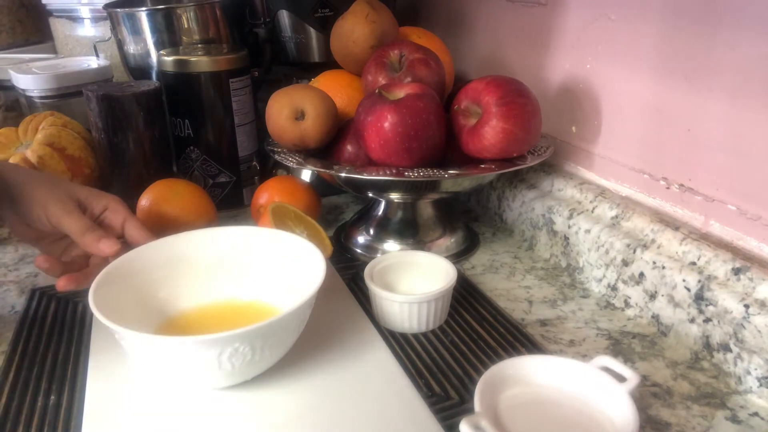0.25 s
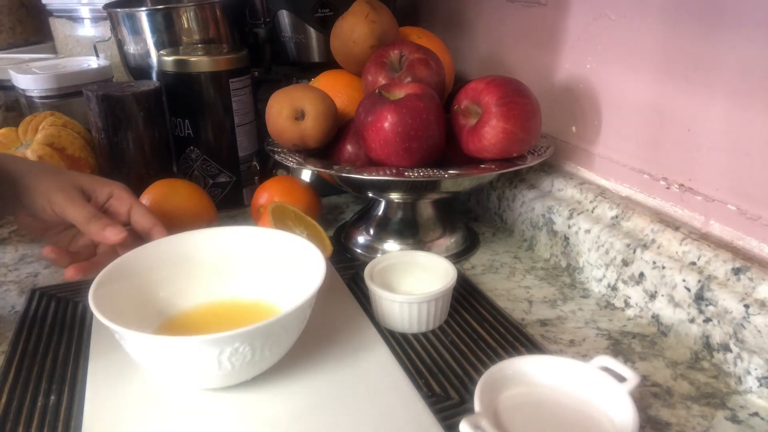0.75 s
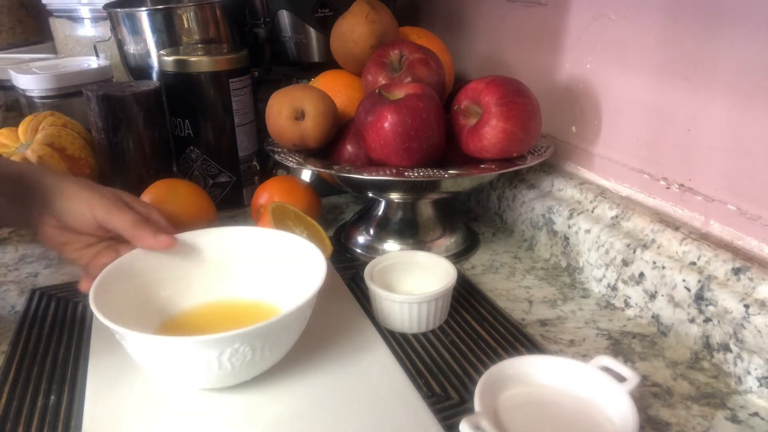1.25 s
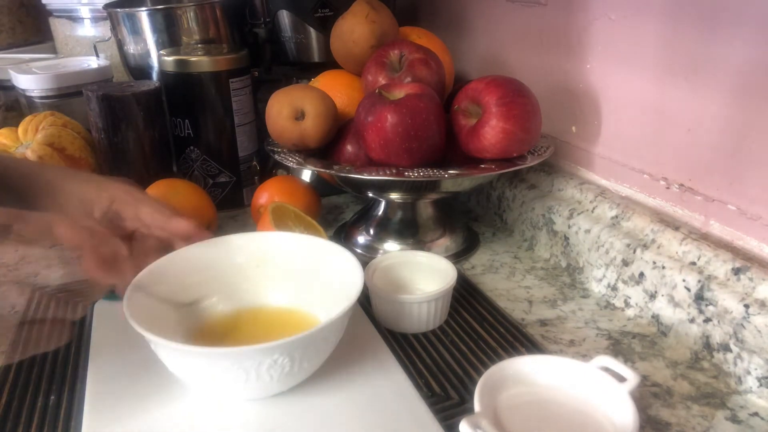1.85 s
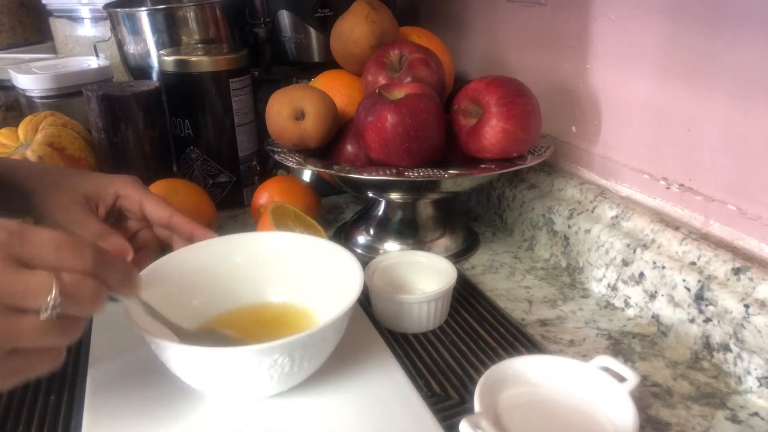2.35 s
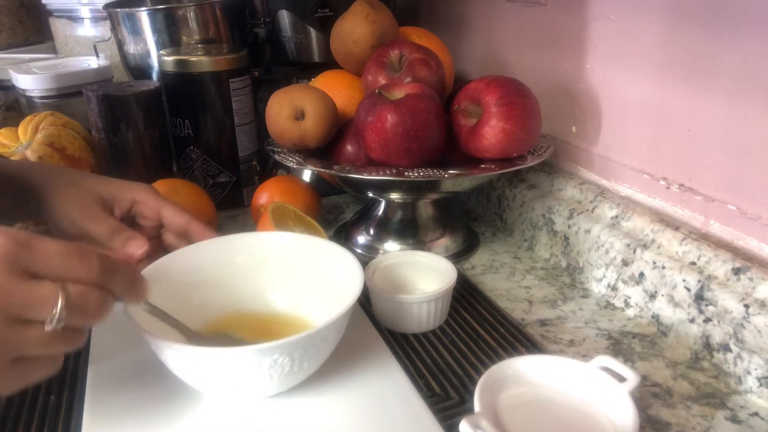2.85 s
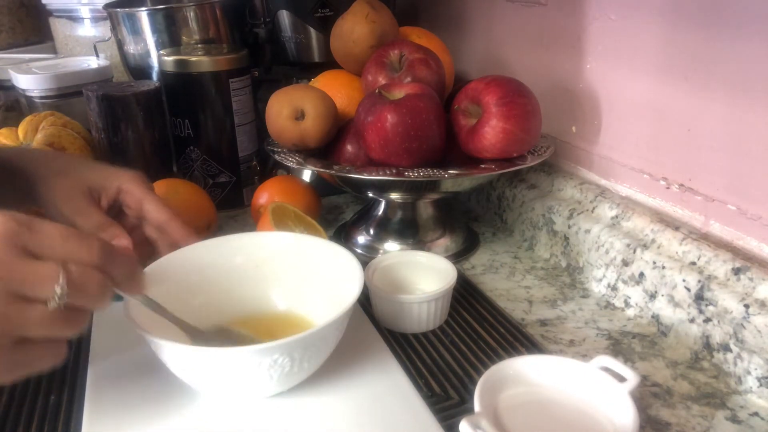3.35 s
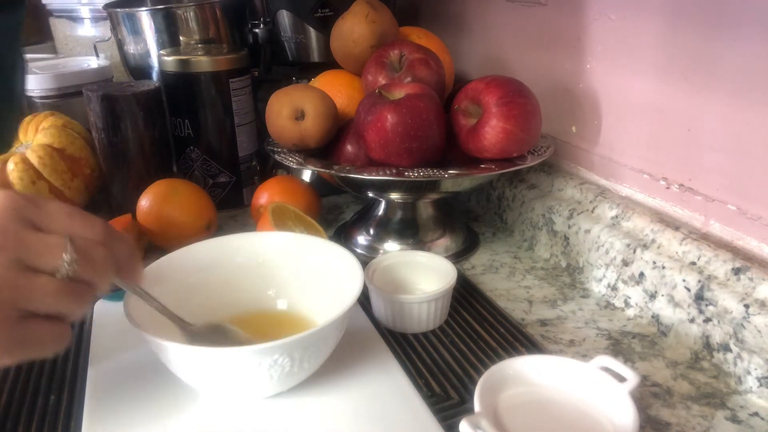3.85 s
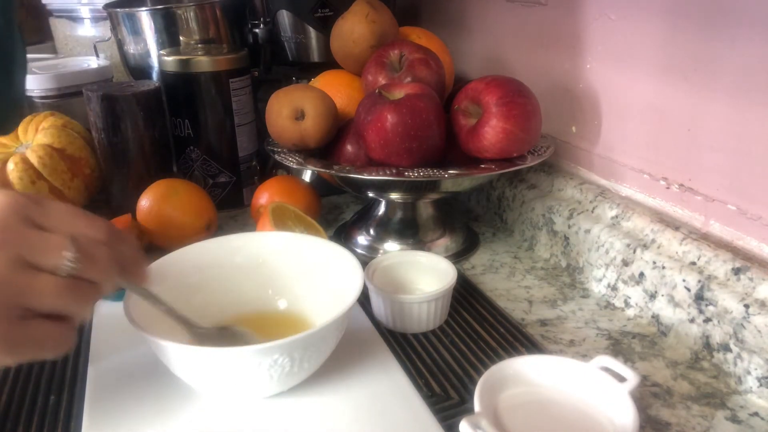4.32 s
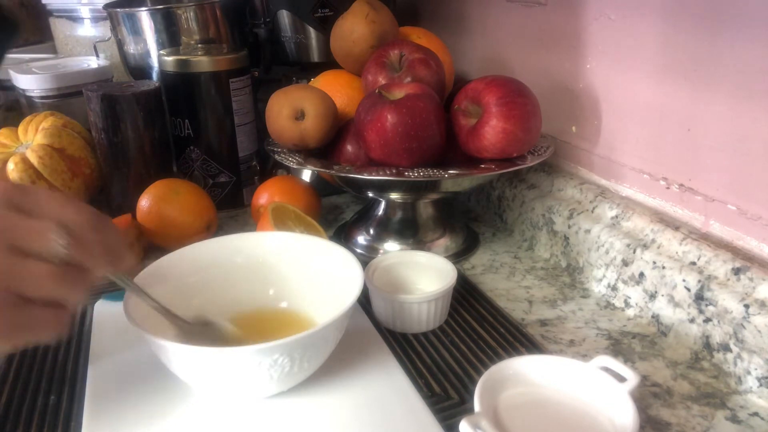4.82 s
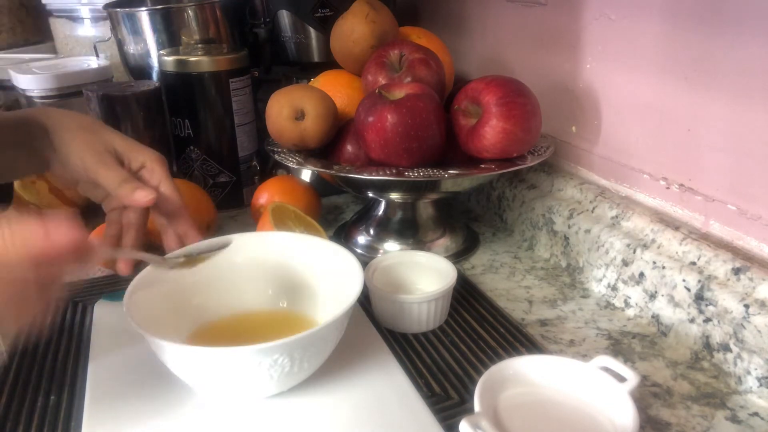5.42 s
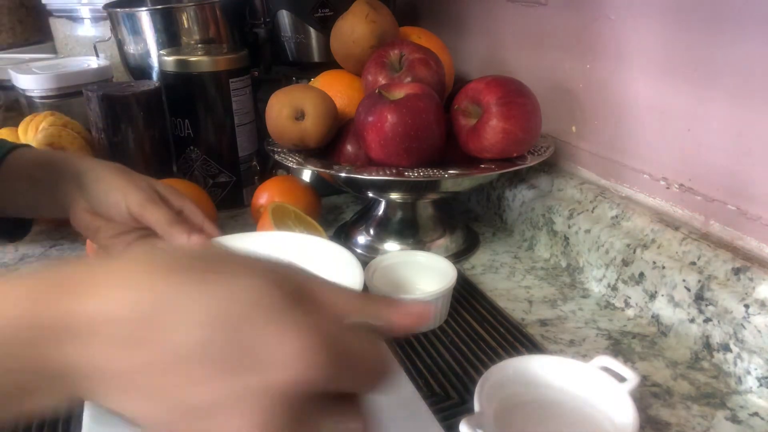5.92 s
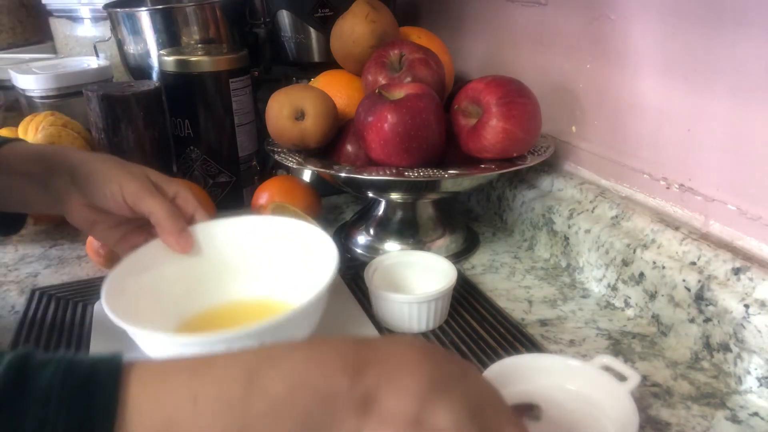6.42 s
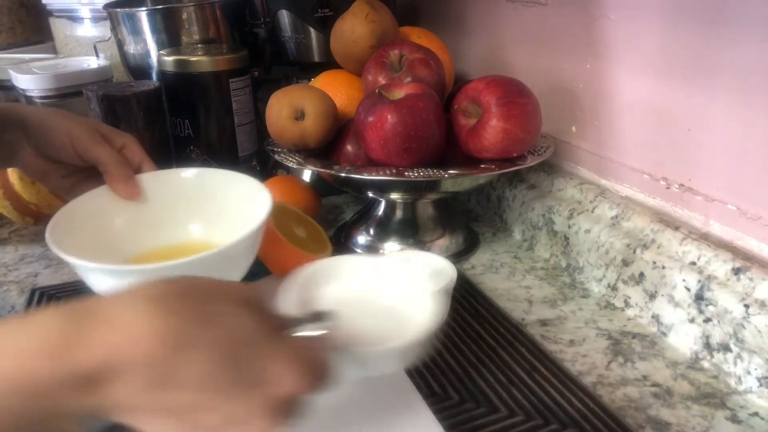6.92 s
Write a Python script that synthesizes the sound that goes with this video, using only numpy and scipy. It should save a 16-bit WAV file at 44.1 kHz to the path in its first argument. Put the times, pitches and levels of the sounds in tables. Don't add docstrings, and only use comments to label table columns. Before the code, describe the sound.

Booming bowl knocks and a rasping slide on a counter, a spoon clink, squeaky singing stirring scrapes, then faint hand rustles over a fridge hum.

```python
import sys
import numpy as np
from scipy import signal
from scipy.fft import rfft, irfft, next_fast_len
from scipy.io import wavfile
from scipy.ndimage import uniform_filter1d

SR = 44100
rng = np.random.default_rng(int(sys.argv[2]) if len(sys.argv) > 2 else 0)


def wav_out(sig):
    wavfile.write(sys.argv[1], SR, np.round(np.clip(np.atleast_2d(sig).T, -1, 1) * 32767).astype(np.int16))


def how_loud(loudness_db):
    steps = np.asarray(loudness_db, float) / 20
    return 10 ** steps


N = 316197

BOOM_HZ, BOOM_UP_HZ = 127, 153.5
LET_GO_S = 3.48
SWELL_DB = 12
# frequency in Hz, level in dB per Hz.
DULL = [(250, -14.5), (450, -1.5), (800, 6), (1200, 1), (2200, -10), (3500, -25.5)]
# frequency in Hz, level in dB per Hz.
BRIGHT = [(1500, -2), (2500, -7.5), (4500, -3), (6000, -6), (7500, -9), (11000, -29), (15000, -49.5)]


def unit(x):
    return x / np.sqrt(np.mean(x ** 2) + 1e-20)


def add(track, s, sound):
    track[round(s * SR):][:len(sound)] += sound


def along(points, hz):
    f, v = np.transpose(points)
    return np.interp(np.log(hz + 1), np.log(f + 1), v)


def curves(rows, outside=None):
    s, *cols = np.transpose(rows)
    return [np.interp(np.arange(N) / SR, s, c, outside, outside) for c in cols]


def swells(rows, order=1):
    power, t = np.full(N, 1e-15), np.arange(N) / SR
    for s, rise, fall, db in rows:
        near = slice(max(int((s - 5 * rise) * SR), 0), int((s + 5 * fall) * SR))
        away = np.maximum((s - t[near]) / rise, (t[near] - s) / fall)
        power[near] += how_loud(2 * (db - SWELL_DB * away ** order))
    return 10 * np.log10(power)


def noise(spectrum):
    size = next_fast_len(N)
    hz = np.fft.rfftfreq(size, 1 / SR)
    inside = (hz > spectrum[0][0]) & (hz < spectrum[-1][0])
    coloured = rfft(rng.standard_normal(size)) * how_loud(along(spectrum, hz)) * inside
    return unit(irfft(coloured, size)[:N])


def grit(rate, spread_db):
    bumps = rng.standard_normal(N // 20)
    return unit(how_loud(spread_db * np.interp(np.arange(N) * rate / SR, np.arange(len(bumps)), bumps)))


def resonate(x, hz, width_hz, onset=5):
    turn = np.exp(2j * np.pi * np.cumsum(np.broadcast_to(hz, N)) / SR)
    keep = np.exp(-np.pi * abs(width_hz) / SR)
    slow = signal.lfilter([1 - keep ** onset], np.poly([keep, keep ** onset]), x / turn)
    return np.real(slow * turn)


def ring(modes, cycles):
    out = np.zeros(SR)
    for hz, db, t60 in modes:
        t = np.arange(min(SR, int(1.5 * t60 * SR))) / SR
        build = 1 - np.exp(-t * hz / cycles)
        add(out, 0, how_loud(db - 60 * t / t60) * np.sin(2 * np.pi * hz * t) * build)
    return out


def crack(t60, low_hz, high_hz, hold=0):
    burst = rng.standard_normal(SR) * how_loud(-60 * np.maximum(np.arange(SR) / SR - hold, 0) / t60)
    band = signal.butter(3, [low_hz, min(high_hz, .45 * SR)], "band", fs=SR, output="sos")
    return signal.sosfilt(band, burst) * np.sqrt(SR / 2 / (high_hz - low_hz))


def catch(hz, half_s):
    t = np.arange(SR // 10) / SR
    return (t / half_s) ** 2 * np.exp(1 - (t / half_s) ** 2) * np.sin(2 * np.pi * hz * t)


def knocks():
    # start in seconds, peak in dB, crack in dB over it.
    hits = [
        (0.4031, -24.5, -8.5),
        (0.9381, -16, -11),
        (1.0204, -15, -13.5),
        (3.4453, -32, -36),
    ]
    # top frequency in Hz, level in dB, t60 in seconds.
    clatter = [(2630, -16, 0.32), (4700, 7.5, 0.023), (1700, -6.5, 0.261), (2500, -4.5, 0.041)]
    # frequency in Hz, level in dB, t60 in seconds.
    board = [
        [(BOOM_HZ, -2, 0.49), (BOOM_UP_HZ, 0, 0.23), (220.5, -2.8, 0.14), (314, 0.9, 0.049), (580, 11.8, 0.032),
         (833, 3.77, 0.063), (1717, 2.5, 0.039), (2390, -2, 0.031), (2700, -6.5, 0.039), (4050, -11.5, 0.052),
         (4730, -8.5, 0.0305), (7260, 2.3, 0.011), (7770, -1, 0.0196)],
        [(BOOM_HZ, -10.5, 0.33), (BOOM_UP_HZ, -7.5, 0.18), (231, -2.5, 0.08), (650, -8, 0.07), (875, -5, 0.055),
         (1110, -6, 0.025), (1310, 0.5, 0.03), (1650, -1.5, 0.049), (2345, 2.5, 0.029), (1900, -4, .03),
         (2880, -6, 0.053), (4020, -6, 0.021), (6040, -6.5, 0.048), (7750, -4.5, 0.03)],
        [(BOOM_HZ, -6.5, 0.33), (BOOM_UP_HZ, 0, 0.24), (241, 10, 0.056), (290, -6.5, 0.1), (455, 3, 0.0467),
         (530, 8.5, 0.034), (570, 7.1, 0.048), (742, 2.1, 0.044), (840, -0.5, 0.08), (972, 14.8, 0.017),
         (1093, 9, 0.012), (1800, -1.3, 0.043), (2380, -11, 0.042)],
        [(416, 0, 0.014), (700, 23.5, 0.0064), (2300, 6.5, 0.00594)],
    ]
    # start in seconds, level in dB.
    rebounds = [
        (0.429, -44),
        (0.441, -40),
    ]
    # start in seconds, peak in dB.
    chatter = [(0.4268, -31.5), (0.4405, -31), (0.4483, -36), (0.4555, -37), (0.488, -55), (0.507, -50),
               (0.52, -47), (0.533, -49), (0.549, -49), (0.559, -51), (0.585, -56), (0.9524, -38.5),
               (1.0208, -23), (1.0317, -27), (1.043, -37), (1.05, -33), (1.064, -42), (1.0694, -43),
               (1.0968, -42)]
    # frequency in Hz, level in dB, t60 in seconds.
    cutlery = [(2530, 2, 0.023), (4220, -3.5, .03), (4780, 4, 0.015), (5900, 5.5, 0.01), (6800, 8.5, 0.015),
               (7810, 10.5, 0.016), (8700, 8.5, .012), (9470, 8, .012)]
    boom_lag_s = .004
    out = np.zeros(N + SR)
    for (s, db, crack_db), (top_hz, clatter_db, clatter_t60), modes in zip(hits, clatter, board):
        wood = [m for m in modes if m[0] > BOOM_UP_HZ]
        boom = [m for m in modes if m[0] <= BOOM_UP_HZ]
        add(out, s, how_loud(db - 8.5) * ring(wood, cycles=0.91))
        add(out, s + boom_lag_s, how_loud(db - 7.5) * ring(boom, cycles=0.91))
        add(out, s, how_loud(db + crack_db - 5.0) * crack(0.014, low_hz=3795, high_hz=11600, hold=0.0011))
        rattle = crack(clatter_t60, low_hz=300, high_hz=top_hz, hold=0.0026)
        add(out, s, how_loud(db + clatter_db - 12.5) * rattle)
    add(out, hits[1][0], how_loud(-37.5) * crack(.17, low_hz=450, high_hz=2500, hold=.008))
    for s, db in rebounds:
        add(out, s, how_loud(db) * (ring(board[0][2:], cycles=1.0) + how_loud(5) * ring(board[0][1:3], cycles=.9)))
    for s, db in chatter:
        steel = [(hz, level + rng.normal(0, 0.67), t60) for hz, level, t60 in cutlery]
        tick = how_loud(db - 5.0) * crack(0.0035, low_hz=5500, high_hz=14700)
        add(out, s + 0.00097, how_loud(db - 17.5) * ring(steel, cycles=1.8) + tick)
    return out[:N]


def slides():
    # time in seconds, body in dB, grit in dB over the body.
    nudge_levels = [(0.465, -50.5, -17), (0.493, -63, -7), (0.537, -53.5, -13.5), (0.547, -64.5, -2),
                    (0.569, -58, -13), (0.63, -62.5, 0), (0.642, -65, 4.5), (0.685, -61, 0),
                    (0.695, -62.5, -4.5), (0.73, -65, -4), (0.75, -72.5, 1), (0.8, -76, -5.5),
                    (0.82, -68, -6.5), (0.88, -72, -5.5), (0.925, -66.5, -1.5)]
    # frequency in Hz, width in Hz, level in dB.
    foot = [(719, 22, 4.5), (1704, 42, 3.5), (2710, 130, -2), (4096, 200, -8.5), (5850, 200, -7.5),
            (7480, 400, -10), (12400, 500, -17.5)]
    # frequency in Hz, level in dB per Hz.
    fizz = [(6500, -2), (15500, -11.5)]
    # time in seconds, body in dB, grit in dB over the body.
    slide_levels = [
        (1.29, -100, 6),
        (1.316, -56.5, -9),
        (1.372, -49.5, -11),
        (1.604, -54, -17),
        (1.82, -78, -12),
    ]
    # frequency in Hz, level in dB per Hz.
    rasp = [(71, -43), (120, 0), (210, -1.5), (355, -7), (457, 0.5), (632, -15), (692, -9), (993, -2.5),
            (1800, -9), (2940, -23.5), (4870, -26.5), (7650, -46), (9000, -56), (11700, -62), (19800, -120)]
    # time in seconds, peak in dB, pitch in Hz.
    snag_rows = [(1.319, -51, 1880), (1.32, -38.5, 1318), (1.329, -39, 1185), (1.348, -42, 980),
                 (1.357, -38, 1040), (1.378, -45, 824), (1.378, -32, 1020), (1.419, -34, 1280),
                 (1.433, -32, 1160), (1.476, -33, 1065), (1.495, -33.5, 1237), (1.524, -37.5, 1010),
                 (1.632, -44, 1118), (1.647, -38, 1160), (1.688, -48, 1170)]
    rub = grit(rate=170, spread_db=5.0) * rng.standard_normal(N)
    body_db, grit_db = curves(nudge_levels, -150)
    sung = np.zeros(N)
    for hz, width, db in foot:
        follow_db = grit_db + 9.5 if hz > 3500 else 0
        sung += how_loud(db + follow_db) * unit(resonate(rub, hz, width))
    nudge = how_loud(body_db - 4.5) * (sung + how_loud(-2.5) * noise(DULL))
    nudge += how_loud(body_db + grit_db - 2.0) * (noise(BRIGHT) + how_loud(-3.5) * noise(fizz))

    body_db, grit_db = curves(slide_levels, -150)
    slide = how_loud(body_db + 3.5) * noise(rasp) + how_loud(body_db + grit_db - 7.5) * noise(BRIGHT)
    snags = np.zeros(N)
    for s, db, hz in snag_rows:
        snag = catch(hz, half_s=0.0034) + how_loud(-8.5) * catch(0.93 * hz, half_s=0.00246)
        add(snags, s - .002, how_loud(db - 6.5) * snag)
    return snags + nudge + grit(rate=160, spread_db=1.5) * slide


def spoon_controls():
    # peak in seconds, rise in seconds, fall in seconds,
    # pressure in dB, steepness in dB (upper resonance over the lower).
    strokes = [(2.13, 0.089, 0.108, -63.5, -5), (2.38, 0.074, 0.11, -58.5, -12),
               (2.55, 0.1, 0.089, -53, -17), (2.71, 0.109, 0.046, -60, -5.5), (2.9, 0.063, 0.13, -55, -15),
               (3.01, 0.177, 0.066, -63, -32), (3.109, 0.072, 0.084, -50.5, -11.5),
               (3.25, 0.15, 0.065, -57, -8), (3.44, 0.14, 0.051, -52, -8), (3.569, 0.07, 0.064, -45.5, -11),
               (3.72, 0.068, 0.097, -53, -3), (3.86, 0.033, 0.13, -54.5, -2.5),
               (3.95, 0.11, 0.063, -50, -8.5), (4.07, 0.15, 0.079, -54, -17.5),
               (4.24, 0.1, 0.11, -54, -5.5), (4.371, 0.0273, 0.13, -56.5, 1), (4.47, .12, 0.112, -49, -17),
               (4.62, 0.044, 0.091, -48.5, -12), (4.73, 0.0534, 0.14, -47.5, -9.5),
               (4.815, 0.016, 0.016, -45, -5.5)]
    # middle in seconds, length in seconds,
    # level in dB, first pitch in Hz, last pitch in Hz.
    squeaks = [(2.136, 0.077, -76, 5970, 5950), (2.449, 0.089, -67.5, 5780, 6400),
               (2.564, 0.027, -68, 5250, 5250), (2.93, 0.085, -68, 5250, 5230),
               (3.11, 0.019, -58, 5200, 5260), (3.253, 0.044, -65.5, 5180, 5100),
               (3.446, 0.058, -57.5, 5570, 5670), (3.543, 0.0225, -63, 6090, 6120),
               (3.586, 0.022, -76, 6000, 5900), (3.716, 0.07, -62.5, 5650, 5830),
               (3.789, 0.176, -71, 6160, 6100), (3.906, 0.067, -65, 5550, 5500),
               (3.944, 0.093, -61.5, 5330, 5120), (4.24, 0.085, -62, 5580, 6040),
               (4.394, 0.082, -66.5, 5200, 5250), (4.45, .05, -67, 5500, 5650),
               (4.49, 0.049, -67, 5250, 5200), (4.622, 0.16, -75, 6060, 5850),
               (4.705, 0.12, -60.5, 5680, 5900), (4.831, 0.03, -61.5, 6158, 6060)]
    lift_s, lift_db_per_s = 4.83, 504
    edge_held_db, edge_free_db = -13.5, -10.5
    handle_held_db, handle_free_db = -68, -62.5
    handle_swing = 0.98
    t = np.arange(N) / SR
    lift_db = lift_db_per_s * np.maximum(t - lift_s, 0)
    press_db = swells([row[:4] for row in strokes], order=1.5) - lift_db
    steep = [(s, rise, fall, db + steep_db) for s, rise, fall, db, steep_db in strokes]
    second_db = swells(steep, order=2) - lift_db
    tip_db = swells([(s, 0.7 * length, 0.55 * length, db - 2.0) for s, length, db, _, _ in squeaks], order=2)
    glides = []
    for s, length, _, first_hz, last_hz in squeaks:
        glides += [(s - length / 2, first_hz), (s + length / 2, last_hz)]
    tip_hz, = curves(glides)
    free = t > LET_GO_S
    edge_db = second_db + np.where(free, edge_free_db, edge_held_db)
    handle_db = np.where(free, handle_free_db, handle_held_db) + handle_swing * (press_db + 52.5)
    return press_db, second_db, tip_db, tip_hz, edge_db, np.minimum(handle_db, press_db)


def stirring():
    # time in seconds, spoon resonance in Hz,
    # second resonance in Hz.
    path = [(2.1, 1272, 1620), (2.28, 1210, 1855), (2.45, 1120, 1814), (2.53, 1142, 1690),
            (2.75, 1274, 1760), (2.92, 1110, 1770), (3.06, 1234, 1874), (3.14, 1050, 2000),
            (3.38, 1233, 1810), (3.47, 1233, 1922), (3.58, 1280, 1670), (3.72, 1340, 1730),
            (3.87, 1170, 1724), (3.97, 1114, 1820), (4.04, 1174, 1810), (4.15, 1236, 1730),
            (4.3, 1196, 1770), (4.46, 1098, 1687), (4.63, 1225, 1660), (4.82, 1110, 1660)]
    # time in seconds, peak in dB, pitch in Hz, half length in seconds.
    skips = [(2.362, -47, 1174, 0.0074), (2.418, -49, 1070, 0.0073), (2.499, -45.5, 1190, 0.006),
             (2.889, -52, 1170, 0.012), (2.9728, -44, 1145, 0.0057), (3.002, -40, 1178, 0.0079),
             (3.029, -40.5, 1154, 0.0077), (3.059, -43.5, 1200, 0.0056), (3.095, -43.5, 1194, 0.0049),
             (3.112, -47, 1075, 0.0059), (3.395, -49, 1270, 0.0074), (3.421, -44, 1197, 0.0067),
             (3.442, -36, 1183, 0.0082), (3.4735, -36, 1200, 0.0112), (3.502, -44, 1270, 0.0066),
             (3.528, -35.5, 1242, 0.0073), (3.541, -39, 1320, 0.0053), (3.56, -37, 1310, 0.0064),
             (3.57, -44, 1330, 0.0052), (3.706, -36, 1220, 0.0026), (3.8155, -45, 1168, 0.0082),
             (3.84, -46, 1157, 0.0083), (3.866, -44, 1226, 0.007), (3.9052, -48, 1152, 0.0065),
             (3.906, -43, 1152, 0.0106), (3.9341, -37, 1157, 0.0071), (3.9475, -35, 1102, 0.011),
             (3.9856, -36, 1115, 0.0059), (4.0208, -41.5, 1206, 0.0085), (4.0568, -40.5, 1247, 0.0083),
             (4.226, -45, 1275, 0.0058), (4.245, -37.5, 1214, 0.0067), (4.337, -44, 1105, 0.0079),
             (4.355, -43, 1209, 0.0057), (4.365, -40.5, 1250, 0.0053), (4.386, -45, 1080, 0.0079),
             (4.412, -42.5, 1170, 0.011), (4.425, -34.5, 1143, 0.011), (4.451, -36, 1138, 0.0074),
             (4.479, -36, 1108, 0.0137), (4.509, -37.5, 1150, 0.0065), (4.53, -38, 1100, 0.0053),
             (4.578, -38.5, 1083, 0.0068), (4.6094, -32.5, 1227, 0.011), (4.634, -37.5, 1207, 0.0098),
             (4.6727, -45, 1301, 0.0094), (4.688, -44, 1256, 0.016), (4.7188, -37, 1137, 0.0067),
             (4.793, -46, 1750, 0.0034), (4.805, -32, 1200, 0.0013)]
    # frequency in Hz, level in dB, t60 in seconds.
    bowl_modes = [(2290, -6.5, 0.24), (4520, -10, 0.032), (5100, -4.5, 0.025)]
    lowest_mode = (1016, 2, .7)
    fleck_s, fleck_db = 0.0076, -2.5
    catch_squeak_db = 34
    hz, second_hz = curves(path)
    press_db, second_db, tip_db, tip_hz, edge_db, handle_db = spoon_controls()
    scrape = grit(rate=130, spread_db=2) * rng.standard_normal(N)

    def sing(db, hz, width_hz, onset=5):
        return how_loud(db) * unit(resonate(scrape, hz, width_hz, onset))

    spoon = sing(press_db - 0.5, hz, width_hz=69.4) + sing(second_db, second_hz, width_hz=90)

    tip = sing(tip_db - 3, tip_hz, width_hz=50) * grit(rate=45, spread_db=2.5)
    tip += sing(tip_db - 9, 5150, width_hz=150)
    held = np.arange(N) < LET_GO_S * SR
    tip += sing(np.where(held, tip_db - 5.5, edge_db - 9.5), 4290, width_hz=45)
    tip += sing(tip_db - 16.5, 8950, width_hz=85) + sing(tip_db - 25, 9950, width_hz=120)

    edge = sing(edge_db - 8.0, 3270, width_hz=67) + sing(edge_db - 10, 2950, width_hz=110)
    edge += sing(edge_db - 19.5, 3570, width_hz=47)
    edge += sing(second_db - 18, 1.18 * second_hz, width_hz=41)
    edge += sing(.5 * (press_db + second_db) - 13, 1752, width_hz=700, onset=1.5)

    handle = sing(handle_db - .8, 730.4, width_hz=24) + sing(handle_db - 13.0, 477, width_hz=19.3)

    catches, squeak = np.zeros(N), np.zeros(N)
    for (s, db, catch_hz, half_s), chance in zip(skips, rng.uniform(-0.5, 1, (len(skips), 2))):
        i = round(s * SR)
        flecks = catch(3270 + 90 * chance[0], fleck_s)
        flecks += how_loud(-0.5) * catch(2950 + 500 * chance[1], fleck_s)
        slip = how_loud(db - 4.5) * catch(catch_hz, half_s)
        add(catches, s - .003, slip + how_loud(edge_db[i] + fleck_db) * flecks)
        add(squeak, s + 0.00067, how_loud([db + tip_db[i] + catch_squeak_db]))
    catches += how_loud(11.0) * resonate(squeak, tip_hz, width_hz=94)
    catches += how_loud(-3) * resonate(squeak, 4140, width_hz=47)

    bowl_ring = ring([lowest_mode] + bowl_modes, cycles=0.1)
    bowl = signal.fftconvolve(how_loud(press_db) * scrape, bowl_ring)[:N] * how_loud(-45.0)
    return spoon + tip + edge + handle + catches + bowl


def clinks():
    # start in seconds, peak in dB, ring in dB over it.
    hits = [(1.8787, -34, -10), (2.423, -60, 1), (3.576, -51, -2.5), (3.505, -54, -16), (3.706, -51, -16),
            (4.06, -57, -20.5), (4.191, -54, -16), (4.248, -53, -20), (4.64, -51, -17.5), (3.874, -45, -14),
            (3.541, -56, -6), (3.925, -49, -8), (4.362, -50, -9), (4.424, -51, -5), (4.576, -57, -14),
            (4.588, -58, -20), (4.802, -51, -3.5)]
    # frequency in Hz, level in dB, t60 in seconds.
    rim = [(170, 0.5, 0.058), (698, -5, 0.13), (1010, -7, 1.75), (1200, 18.5, 0.012), (1465, 2.5, 0.073),
           (2010, 9, 0.02), (2326, -10.5, 0.33), (3214, -8.5, .08), (4082, -16.5, 0.34), (4340, 3, 0.03),
           (5230, 5, 0.039), (5754, -2.5, 0.13), (6980, -6, 0.07), (7320, -2, .05), (8500, -2, 0.07)]
    # frequency in Hz, level in dB, t60 in seconds.
    drowned = [(1020, 12.5, 0.16), (1680, 6, 0.025), (2335, -7, 0.56), (3110, 2.5, 0.033),
               (3410, 4, 0.0245), (4260, -1, 0.055), (5200, 3, 0.044), (6100, -5, 0.085)]
    # start in seconds, peak in dB, pitch in Hz, t60 in seconds,
    # snap in dB over the peak.
    taps = [(2.303, -48.5, 500, 0.0146, -23), (5.449, -57, 1560, 0.0128, 8), (5.635, -58, 1700, 0.011, 1.5),
            (5.897, -55, 2300, 0.01, -3), (6.018, -41, 1290, 0.023, -11.5), (6.042, -50, 1230, 0.0286, -22),
            (6.243, -60, 1220, 0.045, -18), (6.681, -65.5, 1840, 0.0105, 8), (6.914, -57, 2080, 0.037, 3),
            (6.942, -55.5, 11950, 0.024, 0.5), (7.092, -63.5, 5030, 0.01, 8.5)]
    snap_hz, snap_db_per_octave, snap_over_pitch = 6250, 28, 2.2
    out = np.zeros(N + SR)
    for (s, db, ring_db), modes in zip(hits, [rim] + [drowned] * len(hits)):
        strike = how_loud(db - 12.0) * crack(0.018, low_hz=887, high_hz=8350)
        add(out, s, how_loud(db + ring_db - 7.0) * ring(modes, cycles=0.95) + strike)
    for s, db, hz, t60, snap_db in taps:
        top_hz = max(snap_hz * 2 ** (snap_db / snap_db_per_octave), snap_over_pitch * hz)
        top_hz = min(top_hz, SR / 3)
        dish = [(hz, 0, t60), (1.71 * hz, -3, 0.72 * t60), (min(3.4 * hz, SR / 3), -14, 0.86 * t60)]
        snap = how_loud(db + snap_db) * crack(0.0096, low_hz=0.21 * top_hz, high_hz=top_hz)
        add(out, s, how_loud(db) * ring(dish, cycles=0.28) + snap)
    return out[:N]


def dishes():
    # peak in seconds, rise in seconds, fall in seconds, level in dB.
    rubs = [
        (6.246, 0.033, .04, -64),
        (6.34, 0.02, 0.022, -74),
        (6.412, .02, 0.024, -66),
        (6.561, 0.026, .03, -67.5),
        (6.583, 0.0069, 0.0126, -56),
    ]
    # frequency in Hz, width in Hz, level in dB.
    resonances = [
        [(1170, 79, 4.5), (450, 66, -2)],
        [(5300, 130, 0), (7300, 360, -5), (1560, 110, 9.5)],
        [(4876, 250, 3.5), (837, 60, -3.5)],
        [(3530, 120, -2), (4560, 310, 1.5), (7400, 120, -3)],
        [(856, 70, -6), (2500, 110, -2.5), (3550, 79, -4), (4514, 170, 4), (5250, 85, -7), (5850, 110, -18),
         (7400, 110, -7.5)],
    ]
    out, t = np.zeros(N), np.arange(-SR // 8, SR // 8) / SR
    for (s, rise, fall, db), peaks in zip(rubs, resonances):
        bumps = uniform_filter1d(rng.standard_normal(len(t)), size=100) * 10
        rub = rng.standard_normal(len(t)) * how_loud(2.46 * bumps)
        sung = np.zeros(len(t))
        for hz, width, level in peaks:
            sung += how_loud(level) * unit(signal.lfilter(*signal.iirpeak(hz, hz / width, SR), rub))
        add(out, s + t[0], sung * how_loud(db - SWELL_DB * np.maximum(-t / rise, t / fall)))
    return out


def hands():
    # peak in seconds, rise in seconds, dull part in dB,
    # bright part in dB over it, weight on the counter in dB over it.
    brush = [
        (5.214, 0.039, -66, -28, 9.5),
        (5.72, 0.14, -79, 6, -8),
        (6.036, 0.026, -60, -12, -28.5),
        (6.19, 0.052, -69.5, 0.5, -17),
        (6.255, 0.021, -62, -12, -1),
        (6.284, 0.025, -63, -13, 10.5),
        (6.341, 0.02, -61, -6, 7.5),
        (6.414, 0.0298, -64.5, -1.5, 0),
        (6.584, 0.025, -58.5, 3.5, 0),
        (6.92, 0.01, -63, -5, -10),
    ]
    # frequency in Hz, level in dB per Hz.
    weight = [(90, -22), (180, 10.5), (350, -0.5), (600, -9.5)]
    # time in seconds, level in dB.
    shuffle = [
        (2.2, -83.5),
        (2.4, -76.5),
        (3.3, -68.5),
        (3.45, -67),
    ]
    # frequency in Hz, level in dB per Hz.
    wet = [(400, -10), (1000, -7.5), (2000, -7.5), (3200, -11), (4600, -19), (5500, -13), (8000, -21),
           (10000, -32)]

    def part(over_db):
        rows = [(s, rise, 0.94 * rise, db + more) for (s, rise, db, *_), more in zip(brush, over_db)]
        return how_loud(swells(rows, order=2))

    *_, bright_db, weight_db = np.transpose(brush)
    strokes = part(0 * bright_db) * noise(DULL) + part(bright_db) * noise(BRIGHT)
    strokes += part(weight_db) * noise(weight)
    creep = how_loud(curves(shuffle, -150)[0] + 4.0) * noise(wet)
    return (strokes + creep) * grit(rate=180, spread_db=1.0)


def scuff():
    # start in seconds, length in seconds, rasp in dB, thump in dB.
    scuffs = [
        (1.96, 0.0175, -47, -46),
    ]
    # frequency in Hz, level in dB, t60 in seconds.
    thump = [(35, 0.5, 0.41), (62.5, 7, 0.15), (134.5, 11, 0.047), (305.4, 0.5, 0.041), (490, 5, 0.04),
             (857, 3, .06)]
    out = np.zeros(N + SR)
    for s, length, rasp_db, thump_db in scuffs:
        add(out, s, how_loud(rasp_db) * crack(0.025, low_hz=202, high_hz=2350, hold=length))
        add(out, s, how_loud(rasp_db - 10.5) * crack(0.032, low_hz=2900, high_hz=9240, hold=length))
        add(out, s + 0.613 * length, how_loud(thump_db) * ring(thump, cycles=0.25))
    return out[:N]


def kitchen(x):
    # frequency in Hz, t60 in seconds.
    decay = [(1000, 0.26), (4000, 0.12), (12000, 0.21)]
    hz, t, z = signal.stft(rng.standard_normal(SR // 2), SR, nperseg=256)
    tail = signal.istft(z * how_loud(-60 * t / along(decay, hz)[:, None]), SR, nperseg=256)[1]
    return signal.fftconvolve(np.pad(x, (150, 0)), tail / np.linalg.norm(tail))[:N]


def background():
    # time in seconds, gain in dB.
    gain = [(0, 2), (1.6, 2), (2.14, -8.5), (2.43, -11.5), (3.24, -4), (3.81, 0), (5.89, 1.5), (6.3, 1),
            (7.17, 0)]
    # frequency in Hz, level in dB per Hz.
    hum = [(15, -66.5), (25, -18.5), (108, 0), (174, -11), (200, -14.5), (271, -18), (374, -18.5),
           (406, -26.5), (442, -14), (474, -34), (700, -48.5), (910, -68.5), (1540, -120)]
    # frequency in Hz, level in dB per Hz.
    hiss = [(290, -15), (500, -4.5), (750, -10), (1280, -13), (1400, -18), (1640, -15), (2260, -21),
            (7980, -22), (8700, -26), (16000, -30.5)]
    whine_hz, whine_width_hz, whine_over_hiss_db = 8700, 340, 1.4
    hum_eases_s, hum_eases_db = 2, 2
    gain_db, = curves(gain)
    hum_db = -63.5 + 1.16 * gain_db
    hum_db += hum_eases_db * (np.arange(N) / SR < hum_eases_s)
    hiss_db = -82.5 + gain_db
    whine = unit(resonate(rng.standard_normal(N), whine_hz, whine_width_hz, onset=0.84))
    steady = how_loud(hum_db + 3.0) * noise(hum) + how_loud(hiss_db + 12.0) * noise(hiss)
    return steady + how_loud(hiss_db + 2.5 + whine_over_hiss_db) * whine


def scene():
    near = knocks() + slides() + clinks() + hands() + dishes()
    spoon = stirring()
    room = how_loud(-12.5) * kitchen(near + how_loud(0.5) * spoon)
    return (near + spoon + room + scuff() + background())[None]


def roll_off(x):
    return signal.sosfilt(signal.butter(12, 16690, fs=SR, output="sos"), x)


def record(dry):
    top = .25
    low_cut = signal.butter(2, 45, "high", fs=SR, output="sos")
    high_cut = signal.ellip(8, .5, 60, 15850, fs=SR, output="sos")
    squashed = dry / (1 + np.abs(dry / top) ** 4) ** (1 / 4)
    mix = signal.sosfilt(np.vstack([low_cut, high_cut]), squashed)
    return roll_off(mix)


dry = scene()
out = record(dry)
wav_out(out)
```